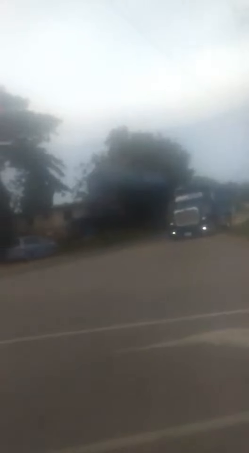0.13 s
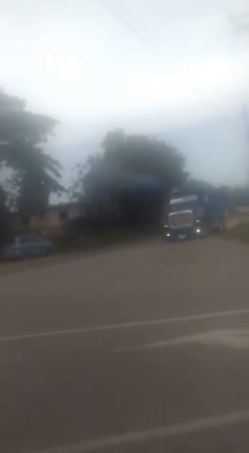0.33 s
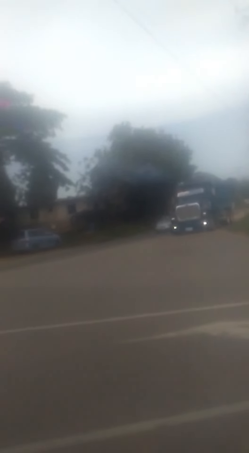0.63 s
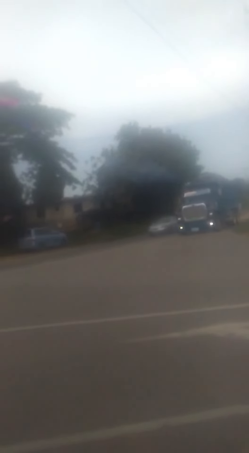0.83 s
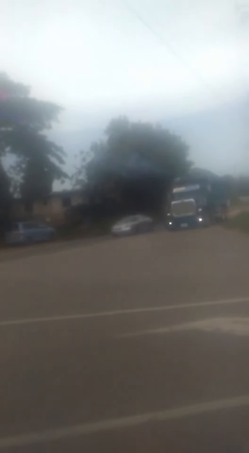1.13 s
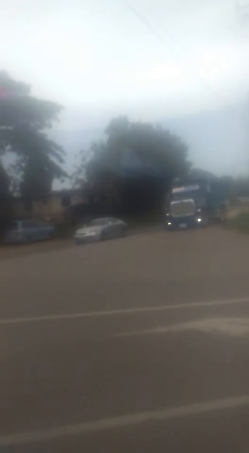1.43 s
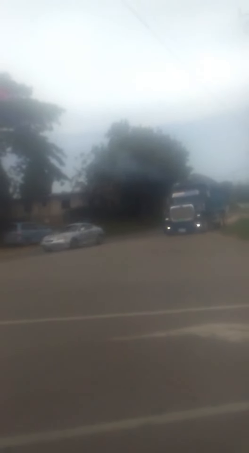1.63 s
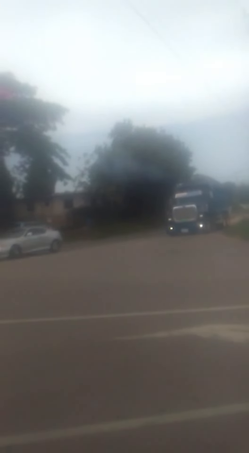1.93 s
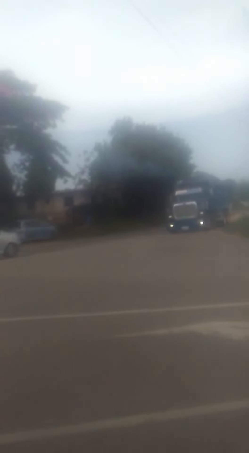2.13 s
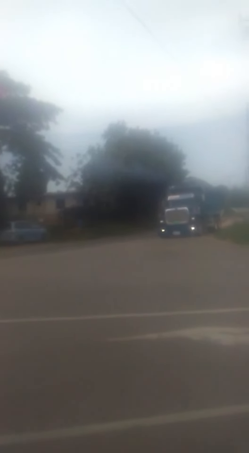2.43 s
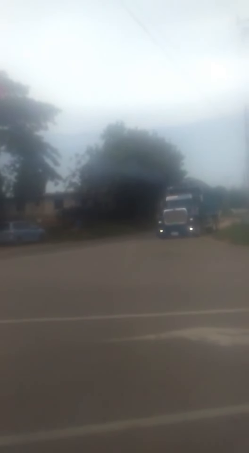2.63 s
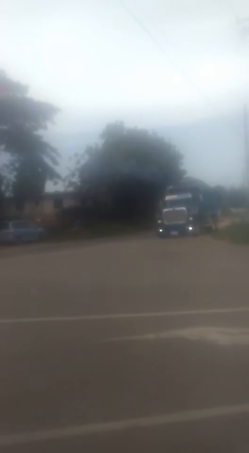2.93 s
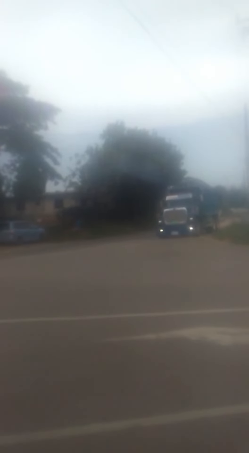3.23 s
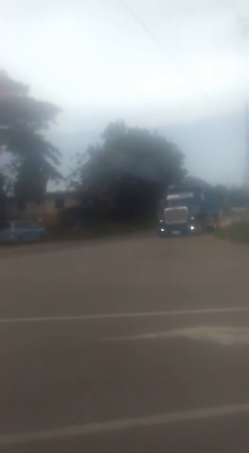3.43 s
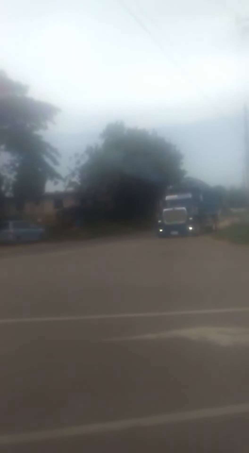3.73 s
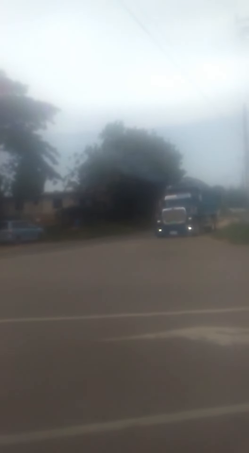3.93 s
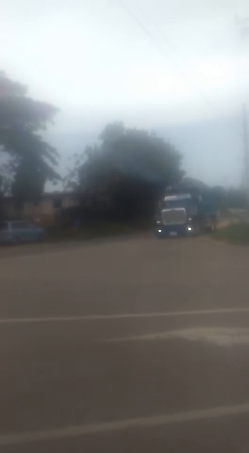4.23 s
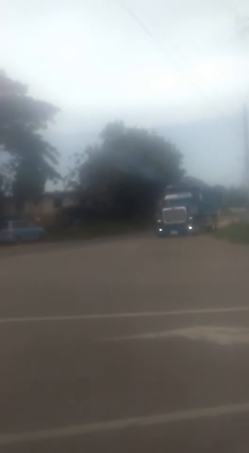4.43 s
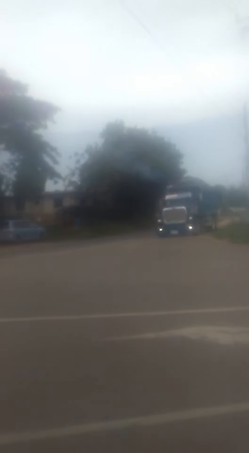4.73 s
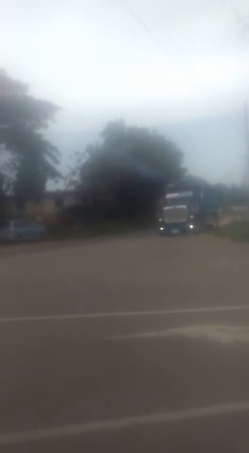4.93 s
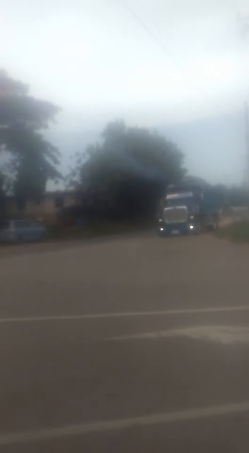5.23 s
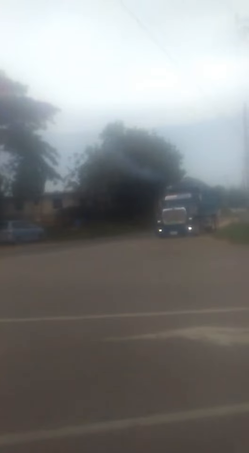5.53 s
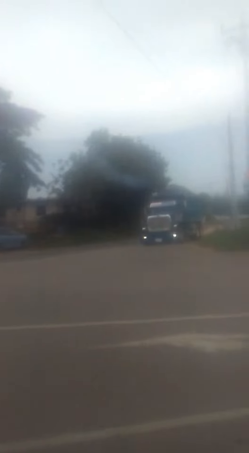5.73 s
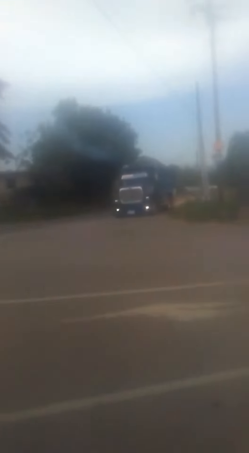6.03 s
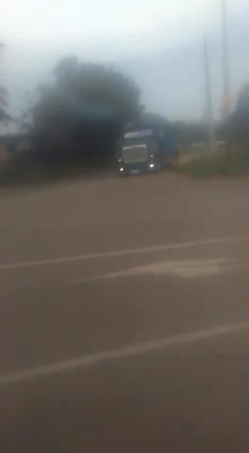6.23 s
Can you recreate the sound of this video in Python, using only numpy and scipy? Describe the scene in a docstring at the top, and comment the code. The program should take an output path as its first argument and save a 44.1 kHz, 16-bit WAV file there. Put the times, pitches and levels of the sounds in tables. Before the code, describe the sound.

Outdoors by a road, through a muffled phone microphone, a distant diesel truck keeps up a rough, wavering drone with a dull roar and nasal clatter. Car tyres swell over it, hissing and howling upward with short dry slaps on road cracks, and fade away by about four seconds. The engine remains alone, nearly constant, until a small tick and several close scratchy rubs of the handled phone end it.

```python
"""A heavy diesel truck drones some way off, creeping towards a phone at the roadside: exhaust harmonics,
firing-rate noise bursts for roar and clatter, a low rumble and brief nasal noise bands.
A car overtakes it and rolls past: bands of tyre noise that swell and recede, a howl gliding up, short slaps.
Near the end something rubs softly as the phone is turned: grainy noise coloured by narrow peaks.
The phone fades in after half a second and hears little above 4 kHz but a thin hiss, ticks and a click."""
import sys
import numpy as np
from scipy.fft import rfft, irfft, next_fast_len
from scipy.io import wavfile
from scipy.ndimage import map_coordinates

SR = 44100
rng = np.random.default_rng(int(sys.argv[2]) if len(sys.argv) > 2 else 0)


def output_pcm(signal):
    """Save a mono or channel-first signal as 16-bit PCM at the path in sys.argv[1].

    Samples are clipped to [-1, 1] before scaling.
    """
    pcm = np.clip(np.atleast_2d(signal).T, -1, 1) * 32767
    wavfile.write(sys.argv[1], SR, np.round(pcm).astype(np.int16))


N = 280740
TIME = np.arange(N) / SR

# Spectra in this file: (frequency [Hz], relative density [dB]); each is scaled to rms 1.
# Phone hiss and its top sheen: (frequency [Hz], relative density [dB])
HISS_SPECTRUM = [(4500, -37.5), (5300, -11.5), (6500, -6), (7800, -2.5), (9500, -3.5), (12000, -10.5),
                 (16000, -27.5)]
SHEEN_SPECTRUM = [(6000, -28.5), (9000, -6), (11000, 2.5), (16000, 4)]
# Opening air just above the voice band: (frequency [Hz], relative density [dB])
AIR_SPECTRUM = [(3500, -30), (4300, 0), (5000, -5), (6500, -16), (9000, -35)]
# Phone fade-in: (time [s], gain [linear])
FADE_IN = [(0.486, 0), (0.489, .08), (0.525, .24), (0.585, .33), (0.64, .53), (0.71, .88), (.82, 1)]
# Bright grit spat by the tread: (time [s], level [dB], decay [s], centre [Hz], width [Hz])
GRIT_TICKS = [(2.255, -65.5, .009, 9000, 4500), (2.394, -66, .008, 6400, 2000),
              (2.43, -71, .007, 7700, 1500), (2.663, -61, .013, 7800, 1200),
              (2.926, -63.5, .006, 8600, 1300), (3.055, -66, .004, 7400, 900),
              (3.19, -71, .015, 8000, 2000), (3.386, -71, .006, 8000, 2000)]
# Sharp click: (frequency [Hz], relative density [dB])
CLICK_SPECTRUM = [(2000, -10), (4000, 0), (5500, -2), (8000, -8), (15000, -13)]

# Rubs as the phone is turned: (peak time [s], rise [s], fall [s], swish level [dB], bright level [dB],
# fizz level [dB], top sheen level [dB], peak pitch ratio [-])
RUB_STROKES = [(5.71, .06, .11, -43, -40, -72, -88, 1.02), (5.885, .075, .11, -35, -38, -59.5, -78, 1.01),
               (6.03, .06, .15, -41.5, -47.5, -66.5, -78, 1),
               (6.256, .02, .04, -33.5, -37, -59.5, -65, .99),
               (6.312, .04, .07, -32.5, -32.3, -56, -62, .985)]
# Narrow peaks at 3.3-4 kHz colouring the rubs: (centre [Hz], width [Hz], level re plain rubbing [dB])
RUB_PEAKS = [(3300, 70, 2), (3450, 90, 4), (3560, 70, 5), (3680, 90, 8), (3790, 80, 4.5), (3970, 90, 5.5)]
# Dull swish, bright part and fizz of a rub: (frequency [Hz], relative density [dB])
SWISH_SPECTRUM = [(450, -18), (850, -1), (1300, -4), (1600, 1.5), (2050, 6), (2450, -2.5), (3000, -5),
                  (3500, -15)]
BRIGHT_RUB_SPECTRUM = [(1800, -27), (2700, -5), (3200, -2.5), (3400, 4), (3700, -0.5), (4050, 2),
                       (4500, -7)]
RUB_FIZZ_SPECTRUM = [(4500, -45), (5300, -16), (6300, -5.5), (7700, 0), (9000, -3), (10500, -8),
                     (13000, -12), (16000, -22)]

# Car tyre roar, body rumble and tread hiss: (frequency [Hz], relative density [dB])
TYRE_SPECTRUM = [(200, -25), (380, -11), (520, -6.5), (700, 0.5), (900, 0), (1080, -2), (1300, -12),
                 (1800, -12), (2350, -12), (3000, -23), (4000, -42)]
BODY_SPECTRUM = [(120, -39), (150, -11), (185, -2.5), (220, -6), (260, 4), (320, -6.5), (390, -4.5),
                 (490, -2), (600, -20), (1000, -33)]
TREAD_SPECTRUM = [(700, -31), (1200, 5), (1550, 1), (1900, 0.5), (2200, 0.5), (2500, -7), (3000, -13.5),
                  (3700, -14.5), (4500, -24.5)]
# Rough and smooth road: (time [s], half length [s], body change [dB], tyre change [dB], tread change [dB])
ROAD_PATCHES = [(1.55, 0.14, 1.5, 0, -6), (1.95, 0.13, 3, -1.5, -1), (2.22, 0.15, 1, -0.5, 1.5),
                (2.42, 0.051, -3, -2.5, 3), (2.66, 0.18, 4, 1.5, -0.5), (3.06, 0.13, -4, 0, -2),
                (3.3, 0.21, 2, 3, 1.5), (3.85, 0.12, -1, -1, -5), (4.17, 0.13, 4, -2, -2)]
# Brief tyre notes and rushes: (time [s], half length [s], centre [Hz], glide [Hz/s], width [Hz], level [dB])
TYRE_BANDS = [(1.3, .25, 1050, 0, 170, -41), (1.75, .35, 890, 0, 70, -38.5),
              (1.98, .22, 1530, 110, 85, -40.5), (1.98, .2, 1280, 0, 70, -44),
              (2.21, .06, 845, -300, 110, -30.7), (2.53, .08, 1070, 200, 170, -35.5),
              (2.66, .15, 480, 0, 80, -34.5), (2.78, .12, 2180, -250, 125, -35.8),
              (3.02, .17, 1160, 120, 85, -35.5), (3.3, .22, 2150, -60, 190, -40.5),
              (3.27, .12, 1480, 0, 420, -36.5), (3.3, .08, 560, 0, 380, -36),
              (3.65, .25, 1450, -150, 650, -39.5), (3.95, .3, 1190, -80, 180, -44)]
# Tyre slaps over road cracks: (time [s], level [dB])
CRACK_SLAPS = [(1.742, -22.5), (2.148, -18.5), (2.206, -19), (2.293, -22), (2.561, -21.5), (2.706, -21),
               (3.469, -24)]
# Slap: (frequency [Hz], relative density [dB])
SLAP_SPECTRUM = [(120, -40), (250, -14), (600, -3), (850, 0), (1200, -6), (2400, -13), (3100, -28),
                 (4000, -45)]

# Weaker exhaust lines: (multiple of firing rate [-], level at mid-scene [dB])
EXHAUST_ORDERS = [(1, -67), (2, -60), (6, -51.5), (9, -53), (10, -54), (12, -53), (14, -56), (17, -58),
                  (20, -59)]
# Drone swells and dips: (time [s], half length [s], low line change [dB], octave change [dB])
DRONE_SURGES = [(.5, .05, 6, 6), (.92, .13, 2.5, 6), (1.33, .12, 1, 6.5), (1.63, .1, -1, 8),
                (1.97, .2, 4, 5), (2.35, .12, -3, 0), (2.74, .17, 4, 3), (3.15, .15, -2.5, -2),
                (4.2, .12, 2, -1), (4.8, .2, -1, -2), (5.2, .07, -3, 5), (5.52, .06, 1, 5),
                (5.68, .07, -2, -4), (5.95, .17, 2.8, 5.5), (6.29, .06, 2.5, 2)]
# Truck roar, clatter and rumble: (frequency [Hz], relative density [dB])
ROAR_SPECTRUM = [(125, -40), (145, -8.5), (190, -5.5), (270, -1), (320, -3.5), (400, -0.5), (530, -2),
                 (850, -2.5), (1150, -4.5), (1400, -9), (1850, -10.5), (3000, -24)]
CLATTER_SPECTRUM = [(1200, -23), (1900, -20.5), (2030, 1), (2150, 1.5), (2400, 1), (2750, -3), (3150, -9.5),
                    (3600, -13), (4000, -19.5), (4500, -21.5)]
RUMBLE_SPECTRUM = [(20, -30), (36, -12.5), (48, -2), (70, -1), (105, -3), (120, -10.5), (200, -36.5)]
# Brief changes of the clatter: (time [s], half length [s], change [dB])
CLATTER_CHANGES = [(.69, .025, 2), (1.74, .035, 4), (2.28, .09, 2.5), (3.33, .045, 5), (3.62, .12, 2),
                   (4.19, .04, 3), (5.5, .06, -2)]
# Fixed narrow peaks colouring the clatter, 1.7-3.9 kHz: (centre [Hz], width [Hz], level re plain clatter [dB])
CLATTER_PEAKS = [(1700, 60, 0), (1830, 50, -2), (2020, 50, 4.5), (2140, 50, 0), (2340, 80, 0),
                 (2490, 50, 2), (2660, 50, -1), (2780, 50, -1), (3000, 55, 2), (3290, 55, 2),
                 (3455, 45, 4.5), (3630, 45, 6), (3755, 45, 6), (3900, 45, 5)]
# Nasal noise bands near 2.4 kHz, at the opening and once late:
# (time [s], half length [s], centre [Hz], glide [Hz/s], width [Hz], level [dB])
NASAL_SWELLS = [(.5, .045, 2400, 0, 220, -38), (.85, .25, 2400, 0, 320, -44),
                (5.72, .09, 2330, 0, 220, -44)]

VOICE_BAND_HZ, LOW_CUT_HZ, TOP_HZ = 4050, 38, 15750
# Steady hiss; the early part adds in power, then steps away.
HISS_DB, SHEEN_DB = -77, -74
EARLY_HISS_DB, EARLY_SHEEN_DB, HISS_DROP_S, HISS_DROP_LENGTH_S = -69, -65.5, 2.76, 0.055
FIZZ_SHEEN_DB = -5  # tread sheen re tread fizz
RUB_SHAPE, RUB_GRAIN_DB, RUB_FIZZ_LAG_S = 1.7, 2, .012
SLAP_DECAY_S = .003
TYRE_GRIT_DB = 1.45
HOWL_FROM_HZ, HOWL_TO_HZ, HOWL_TURN_S, HOWL_GLIDE_S = 930, 1236, 2.65, .6
HOWL_WIDTH_HZ, HOWL_PATCHY_DB = 210, 3
RETREAT_POWER = 1.29  # exponent behind the car; 1 ahead of it
# Engine speed at MID_S, its slow sag and its random hunting
MID_S, FIRING_HZ, SAG_HZ_PER_S, HUNT_SHARE = 3.2, 72.0, .13, .0035
# Truck levels at MID_S and their slopes
DRONE_DB, OCTAVE_DB, DRONE_DB_PER_S, ORDERS_DB_PER_S = -42.5, -45.5, 0.32, 0.96
ROAR_DB, ROAR_DB_PER_S = -36, .5
CLATTER_DB, CLATTER_DB_PER_S = -40, -0.21
RUMBLE_DB = -60.5


def amp(db):
    """Decibels to gain."""
    return 10 ** (np.asarray(db) / 20)


def unit(x):
    """Scale to rms 1."""
    return x / np.sqrt(np.mean(x ** 2) + 1e-20)


def wobble(knots_per_s):
    """Smooth random curve through normally distributed knots."""
    knots = rng.standard_normal(int(N * knots_per_s / SR) + 4)
    return map_coordinates(knots, [TIME * knots_per_s])


def filtered(x, response):
    """Zero-phase filter: multiply the spectrum by response(Hz)."""
    m = next_fast_len(N + SR // 2)
    return irfft(rfft(x, m) * response(np.fft.rfftfreq(m, 1 / SR)), m)[:N]


def coloured(x, spectrum):
    """Filter x by a spectrum, interpolated over log frequency, to rms 1."""
    f_hz, db = np.transpose(spectrum)
    return unit(filtered(x, lambda hz: amp(np.interp(np.log(hz + 1), np.log(f_hz), db))))


def noise(spectrum):
    """Steady noise with the given spectrum."""
    return coloured(rng.standard_normal(N), spectrum)


def narrow(centre_hz, width_hz):
    """Narrow noise band: two random curves modulate a carrier in quadrature."""
    phase = 2 * np.pi * np.cumsum(centre_hz) / SR
    return unit(wobble(width_hz) * np.cos(phase) + wobble(width_hz) * np.sin(phase))


def gliding_bands(rows):
    """Sum of narrow noise bands that swell, glide and fade."""
    out = np.zeros(N)
    for time_s, length_s, hz, glide_hz_per_s, width_hz, db in rows:
        t = TIME - time_s
        envelope = np.exp(-.5 * (t / length_s) ** 2)
        out += amp(db) * envelope * narrow(hz + glide_hz_per_s * t, width_hz)
    return out


def peaked(x, peaks):
    """Filter x so that narrow peaks stand out, summed in power with the plain response."""
    def response(hz):
        power = 1
        for centre_hz, width_hz, db in peaks:
            power = power + amp(db) ** 2 / (1 + ((hz - centre_hz) / (width_hz / 2)) ** 4)
        return np.sqrt(power)
    return filtered(x, response)


def swell(peak_s, rise_s, fall_s, shape=2):
    """Rise to 1 and fall back towards 0."""
    length_s = np.where(TIME < peak_s, rise_s, fall_s)
    return np.exp(-np.abs((TIME - peak_s) / length_s) ** shape)


def surges(rows):
    """One gain curve per dB column of (time [s], half length [s], change [dB], ..) rows."""
    return amp(sum(np.outer(dbs, swell(s, length, length)) for s, length, *dbs in rows))


def passing(loudest_s, db, approach_s, retreat_s):
    """Gain of a source that draws near, goes by and recedes."""
    t = TIME - loudest_s
    approach = 1 / (1 + (t / approach_s) ** 2)
    retreat = (1 + (t / retreat_s) ** 2) ** -RETREAT_POWER
    return amp(db) * np.where(t < 0, approach, retreat)


def grit_ticks():
    """Tread grit: noise bands with two-sided exponential envelopes."""
    out = np.zeros(N)
    for time_s, db, decay_s, hz, width_hz in GRIT_TICKS:
        envelope = np.exp(-np.abs(TIME - time_s) / decay_s)
        out += amp(db) * envelope * narrow(np.full(N, hz), width_hz)
    return out


def thin_treble():
    """Faint flickering noise: hiss stepping down once, fizz of tread and rubs; plus grit ticks."""
    early = (1 - np.tanh((TIME - HISS_DROP_S) / HISS_DROP_LENGTH_S)) / 2
    rub_fizz, rub_sheen = np.zeros((2, N))
    for peak_s, rise_s, fall_s, _, _, fizz_db, sheen_db, _ in RUB_STROKES:
        stroke = swell(peak_s + RUB_FIZZ_LAG_S, rise_s, fall_s, RUB_SHAPE)
        rub_fizz += amp(fizz_db) * stroke
        rub_sheen += amp(sheen_db) * stroke
    tread_fizz = passing(loudest_s=3, db=-71.5, approach_s=0.8, retreat_s=0.5) * amp(1.3 * wobble(23))
    tread_sheen = amp(FIZZ_SHEEN_DB) * tread_fizz
    # independent noises add in power
    hiss_gain = np.sqrt(amp(HISS_DB) ** 2 + (amp(EARLY_HISS_DB) * early) ** 2 + tread_fizz ** 2)
    sheen_power = amp(SHEEN_DB) ** 2 + (amp(EARLY_SHEEN_DB) * early) ** 2
    sheen_gain = np.sqrt(sheen_power + tread_sheen ** 2 + rub_sheen ** 2)
    dip = amp(-3 * swell(peak_s=3.82, rise_s=0.23, fall_s=0.23))
    hiss = dip * (hiss_gain * noise(HISS_SPECTRUM) + sheen_gain * noise(SHEEN_SPECTRUM))
    hiss += rub_fizz * noise(RUB_FIZZ_SPECTRUM)
    flicker = unit(amp(0.89 * wobble(500)))
    return hiss * flicker + grit_ticks()


def click(time_s=5.387, peak_db=-40.5):
    """Single filtered impulse with no resonance."""
    impulse = 1.0 * (np.arange(N) == round(time_s * SR))
    pulse = coloured(impulse, CLICK_SPECTRUM)
    return amp(peak_db) * pulse / pulse.max()


def rubbing():
    """Grainy friction strokes: a dull swish, and a bright part with peaks shifted slightly each time."""
    out = np.zeros(N)
    for peak_s, rise_s, fall_s, swish_db, bright_db, _, _, pitch in RUB_STROKES:
        grains = amp(RUB_GRAIN_DB * wobble(350)) * rng.standard_normal((2, N))
        peaks = [(pitch * hz, width_hz, db) for hz, width_hz, db in RUB_PEAKS]
        swish = coloured(grains[0], SWISH_SPECTRUM)
        bright = coloured(peaked(grains[1], peaks), BRIGHT_RUB_SPECTRUM)
        stroke = swell(peak_s, rise_s, fall_s, RUB_SHAPE)
        out += stroke * (amp(swish_db) * swish + amp(bright_db) * bright)
    return out


def tyre_slaps():
    """Each road crack gives one short noise burst, dulled by the rubber."""
    envelope = np.zeros(N)
    for time_s, db in CRACK_SLAPS:
        envelope += amp(db) * (TIME >= time_s) * np.exp(-np.abs(TIME - time_s) / SLAP_DECAY_S)
    rms = np.sqrt(np.mean(envelope ** 2))
    return rms * coloured(envelope * rng.standard_normal(N), SLAP_SPECTRUM)


def tyre_howl():
    """Patchy narrow noise band; its pitch glides up once as the angle to the road changes."""
    turned = (1 + np.tanh((TIME - HOWL_TURN_S) / HOWL_GLIDE_S)) / 2
    howl_hz = HOWL_FROM_HZ + (HOWL_TO_HZ - HOWL_FROM_HZ) * turned
    gain = passing(loudest_s=3, db=-37, approach_s=1.15, retreat_s=0.6) * amp(HOWL_PATCHY_DB * wobble(18))
    return gain * narrow(howl_hz, HOWL_WIDTH_HZ)


def car():
    """Tyres roar on coarse asphalt; roar, tread and body each peak at their own angle."""
    body_surge, tyre_surge, tread_surge = surges(ROAD_PATCHES)
    bumps_db = 0.82 * wobble(23.9)
    grit = amp(TYRE_GRIT_DB * wobble(350))
    tyres = coloured(grit * rng.standard_normal(N), TYRE_SPECTRUM)
    tread = coloured(grit * rng.standard_normal(N), TREAD_SPECTRUM)
    tyres *= tyre_surge * passing(loudest_s=2, db=-29, approach_s=1.28, retreat_s=1.55)
    tread *= tread_surge * passing(loudest_s=3, db=-34.5, approach_s=1.5, retreat_s=0.98)
    body = body_surge * noise(BODY_SPECTRUM)
    body *= passing(loudest_s=2.5, db=-36, approach_s=2.5, retreat_s=2.0)
    rolling = amp(bumps_db) * (tyres + tyre_howl() + tread + body)
    return rolling + gliding_bands(TYRE_BANDS) + tyre_slaps()


def bursts(firings, decay_strokes, uneven_db, scatter_db, between):
    """A decaying noise burst per firing over a steady floor; strength is uneven across six cylinders."""
    stroke = firings.astype(int)
    cylinder_db = uneven_db * np.cos(4 * np.pi * stroke / 6)
    size = amp(cylinder_db + scatter_db * rng.standard_normal(N)[stroke])
    return (between + size * np.exp(-(firings % 1) / decay_strokes)) * rng.standard_normal(N)


def exhaust_line(firings, order, flutter_db, smear_rad):
    """One exhaust harmonic, made unsteady by the air and by uneven combustion."""
    phase = 2 * np.pi * order * firings + smear_rad * wobble(28) + rng.uniform(0, 2 * np.pi)
    return unit(amp(flutter_db * wobble(22)) * np.sin(phase))


def exhaust_drone(firings, t):
    """Harmonics of the firing rate: orders 4 and 8 swell and sink, weaker lines fill in."""
    low = exhaust_line(firings, order=4, flutter_db=2.8, smear_rad=.48)
    octave = exhaust_line(firings, order=8, flutter_db=3, smear_rad=.45)
    low_swell, octave_swell = surges(DRONE_SURGES)
    drone = amp(DRONE_DB) * low_swell * low + amp(OCTAVE_DB) * octave_swell * octave
    drone *= amp(DRONE_DB_PER_S * t)
    for order, db in EXHAUST_ORDERS:
        line = exhaust_line(firings, order, flutter_db=4, smear_rad=.7)
        drone += amp(db + ORDERS_DB_PER_S * t) * line
    return drone


def engine_roar(firings, t):
    """Firing bursts; distance and roadside echoes fill the gaps between them."""
    blasts = bursts(firings, decay_strokes=.5, uneven_db=1.5, scatter_db=3.5, between=1.2)
    return amp(ROAR_DB + ROAR_DB_PER_S * t) * coloured(blasts, ROAR_SPECTRUM)


def diesel_clatter(firings, t):
    """Firing knocks as noise bursts, coloured by fixed narrow peaks."""
    knocks = bursts(firings, decay_strokes=1.0, uneven_db=4.5, scatter_db=4.0, between=3.3)
    clatter = surges(CLATTER_CHANGES)[0] * coloured(peaked(knocks, CLATTER_PEAKS), CLATTER_SPECTRUM)
    return amp(CLATTER_DB + CLATTER_DB_PER_S * t) * clatter


def truck():
    """One firing count drives drone, roar and clatter; nasal bands and a rumble are added."""
    t = TIME - MID_S
    firing_hz = (FIRING_HZ - SAG_HZ_PER_S * t) * (1 + HUNT_SHARE * wobble(9))
    firings = np.cumsum(firing_hz) / SR
    air_db = 1.1 * wobble(25)
    engine = amp(air_db) * (engine_roar(firings, t) + diesel_clatter(firings, t))
    rumble = amp(RUMBLE_DB) * noise(RUMBLE_SPECTRUM)
    return exhaust_drone(firings, t) + engine + gliding_bands(NASAL_SWELLS) + rumble


def scene():
    """Rubbing, car and truck, in mono."""
    return (rubbing() + car() + truck())[None]


def record(dry):
    """Phone: steep low-pass, low cut, added treble and click, fade-in, top cutoff."""
    voice_band = filtered(dry[0], lambda hz: 1 / np.sqrt(1 + (hz / VOICE_BAND_HZ) ** 76))
    voice_band = filtered(voice_band, lambda hz: 1 / np.sqrt(1 + (LOW_CUT_HZ / (hz + 1)) ** 8))
    # the sound opens slightly airier, then narrows
    opening = np.clip((.82 - TIME) / .3, 0, 1) ** 2
    air = amp(-57) * opening * noise(AIR_SPECTRUM)
    fade_in = np.interp(TIME, *np.transpose(FADE_IN))
    heard = fade_in * (voice_band + air + thin_treble() + click())
    return filtered(heard, lambda hz: hz < TOP_HZ)[None]


dry = scene()
out = record(dry)
output_pcm(out)
```